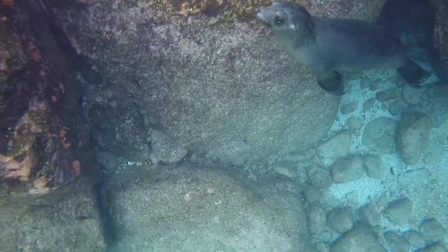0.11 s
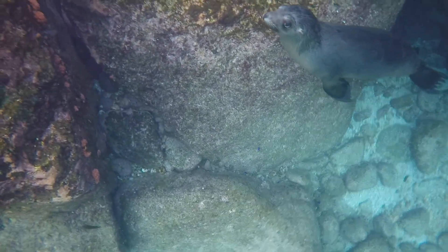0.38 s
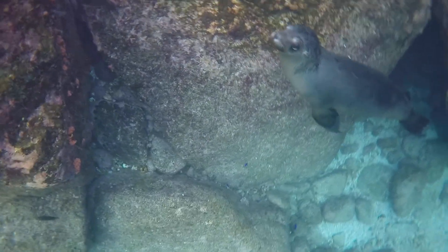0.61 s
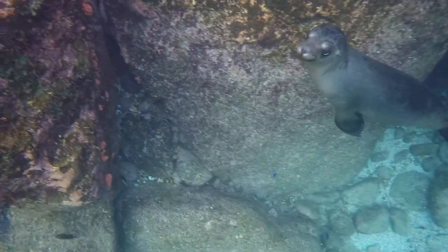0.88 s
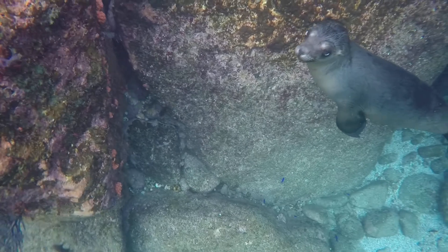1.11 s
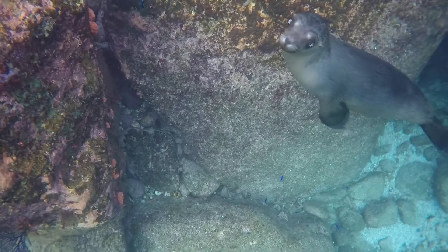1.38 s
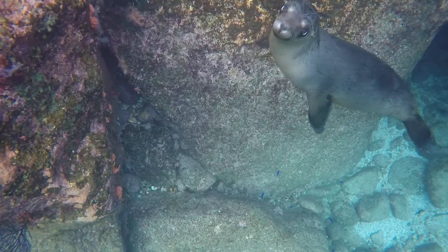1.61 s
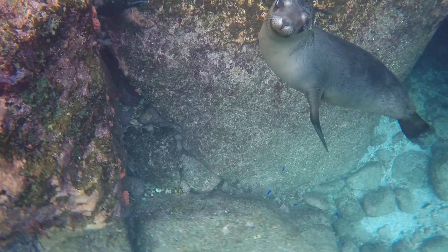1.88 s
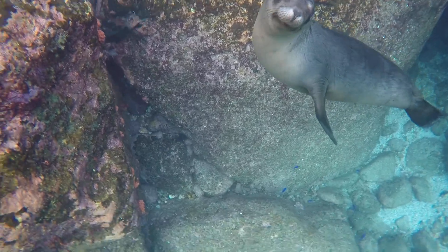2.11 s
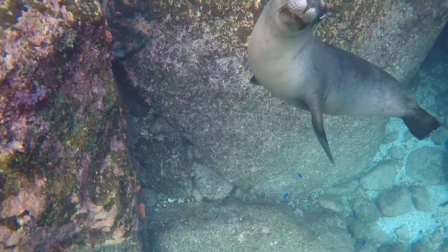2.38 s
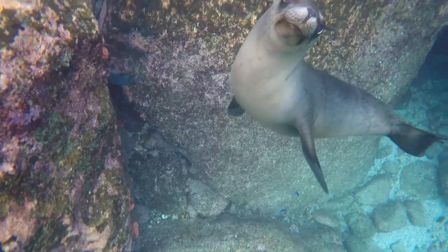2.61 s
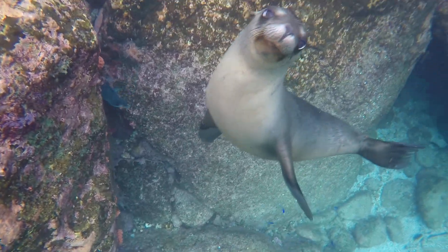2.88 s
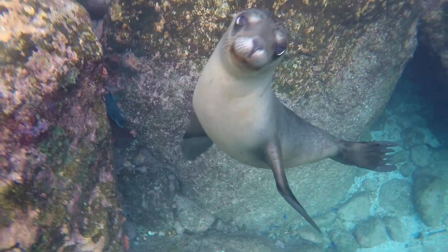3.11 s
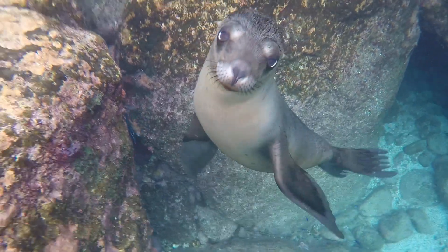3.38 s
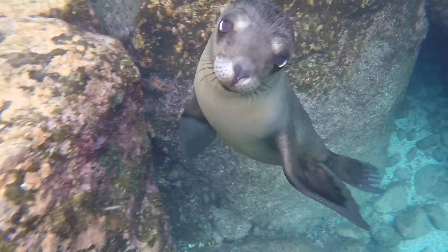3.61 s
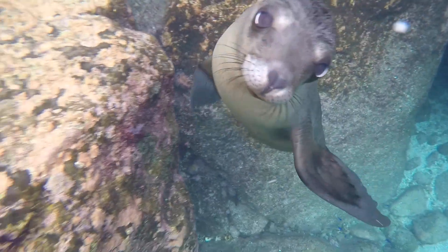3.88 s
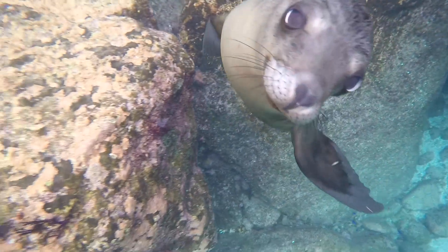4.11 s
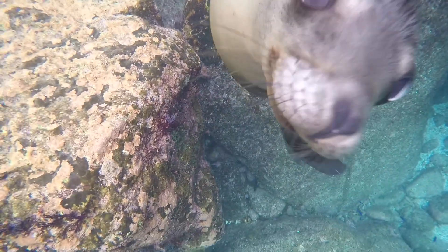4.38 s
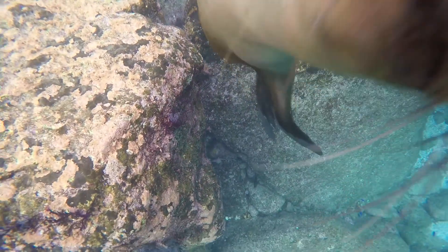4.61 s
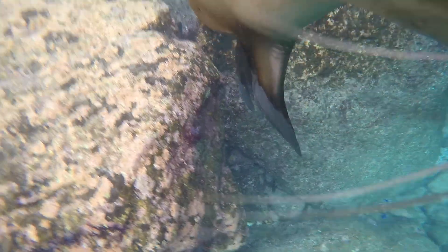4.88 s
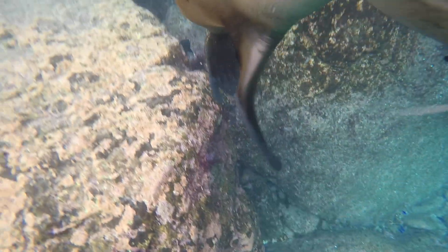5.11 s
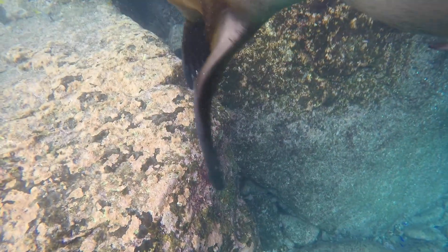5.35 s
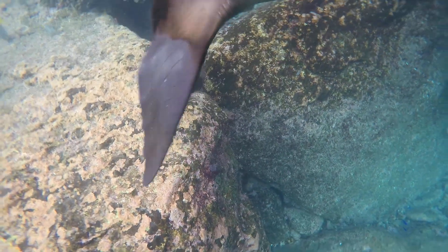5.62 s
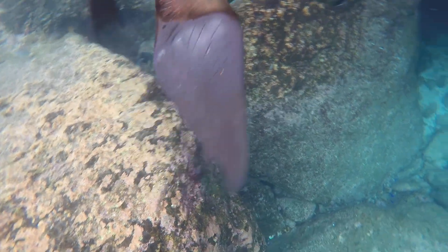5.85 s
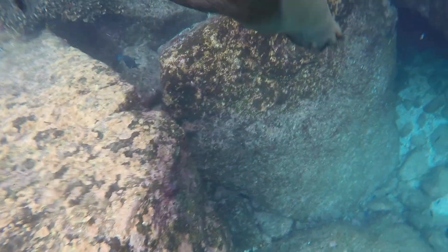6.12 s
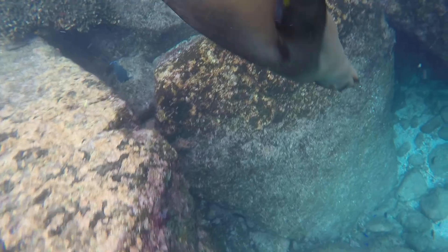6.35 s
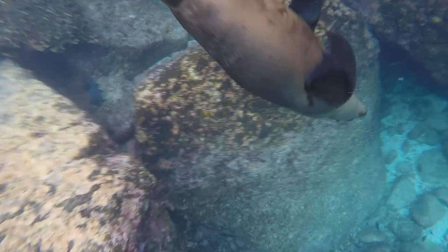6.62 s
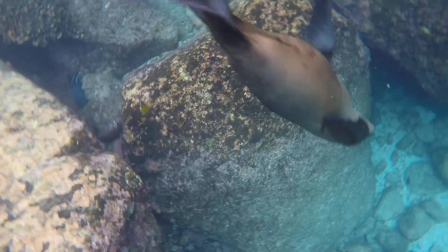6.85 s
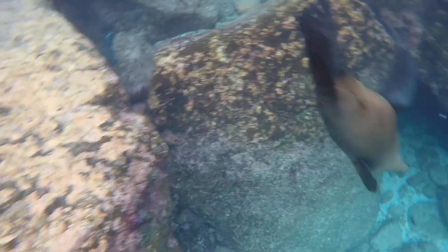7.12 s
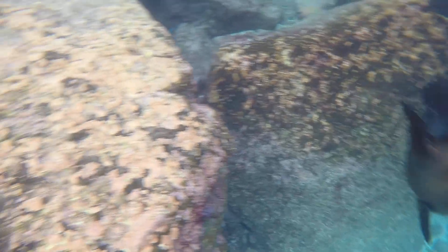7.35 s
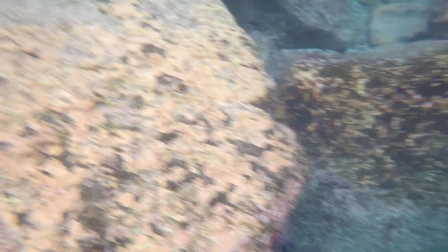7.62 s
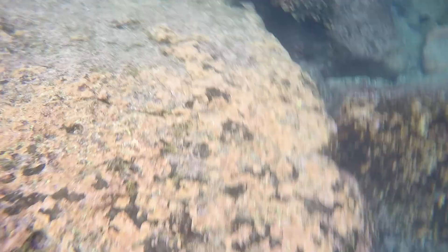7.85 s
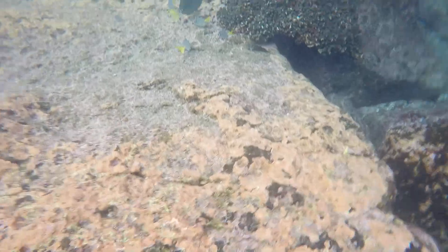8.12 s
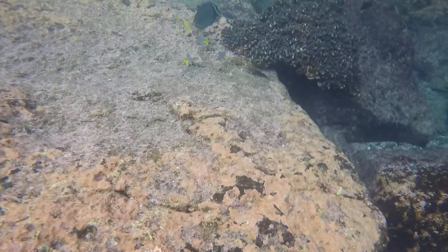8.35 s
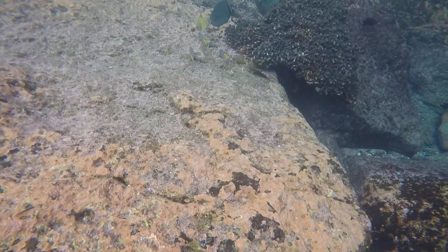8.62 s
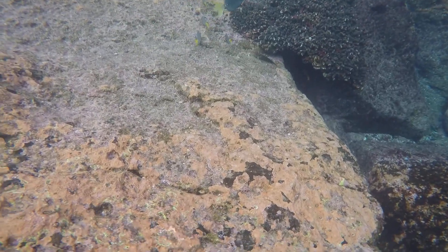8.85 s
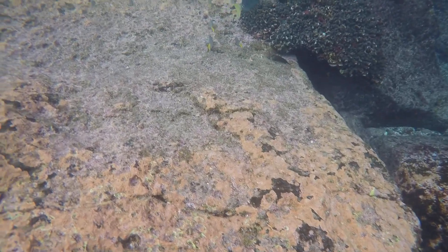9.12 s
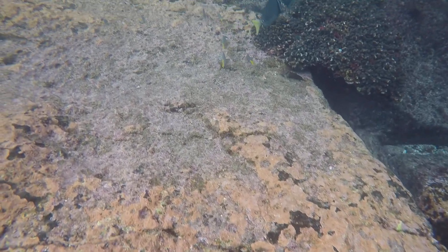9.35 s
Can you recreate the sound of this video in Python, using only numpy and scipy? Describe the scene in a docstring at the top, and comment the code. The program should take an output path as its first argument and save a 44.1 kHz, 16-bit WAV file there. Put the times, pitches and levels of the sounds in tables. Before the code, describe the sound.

Constant snapping-shrimp crackle rings inside a plastic housing above a dull surging rumble, with small bubbles, knocks and one louder cluster past seven seconds.

```python
"""Snapping shrimp click near and far over a shallow rocky reef, heard inside a camera's sealed plastic housing.
Each snap is a fading noise burst ringing the housing's resonances; tiny snaps over a swelling noise make
the far reef, under the microphone's own treble hiss. Shaped noise washes in the lowest resonance and rumbles
as surge, with bumps and taps on the case. Low knocks and rising bubbles are damped tones, a young seal's
whiskers brush past as a rasp of noise, and a faint low hum, a wavering tone in narrow noise, comes and goes."""
import sys
import numpy as np
from scipy import signal
from scipy.fft import rfft, irfft, next_fast_len
from scipy.io import wavfile
from scipy.ndimage import uniform_filter1d

SR = 44100
rng = np.random.default_rng(int(sys.argv[2]) if len(sys.argv) > 2 else 0)


def digitize_waveform(pressure):
    """Quantize a signal to 16-bit integers and store it at the path in sys.argv[1].

    Rows of a 2-D input are taken as channels; values are limited to [-1, 1].
    """
    field = np.atleast_2d(pressure).T
    bounded = np.clip(field, -1, 1)
    quanta = np.round(bounded * 32767).astype(np.int16)
    wavfile.write(sys.argv[1], SR, quanta)


def linear_from_db(decibels):
    """Turn decibels (scalar or array-like) into linear amplitude factors; 0 gives 1."""
    return 10 ** (np.asarray(decibels, float) / 20)


N = 418068
GRAIN = 2048  # samples in one snap or tap

# moving water and the far reef: time_s [s], gurgle_db [dB], wash_db [dB], crackle_db [dB]
WATER = [(0.0, -49.5, -44.5, -53), (0.42, -47, -40.5, -52.5), (0.79, -54, -40, -51.5),
         (1.63, -46.5, -42.5, -53.5), (3.06, -55.5, -38.5, -52.5), (3.27, -53, -41.5, -52.5),
         (4.62, -52, -38, -52), (4.88, -65, -39.5, -54), (5.7, -57.5, -38.5, -52.5),
         (6.36, -46.5, -41, -52.5), (6.97, -50, -40, -52), (7.12, -44.5, -41, -48.5),
         (7.22, -43.5, -37, -51.5), (7.4, -39, -40, -47.5), (7.58, -40, -39, -51.5), (7.7, -47.5, -43, -52),
         (8.05, -42.5, -40, -54.5), (8.17, -42.5, -39.5, -53), (8.42, -49, -40, -52.5),
         (8.84, -44, -38.5, -51.5), (9.48, -53, -38.5, -55.5)]


def curve(table, column):
    """One column of a table, drawn as straight lines between its times."""
    rows = np.array(table)
    return np.interp(np.arange(N) / SR, rows[:, 0], rows[:, column])


def walk(rate_hz):
    """Slow random movement of spread 1: levels held for 1 / rate_hz, then smoothed twice."""
    hold = int(SR / rate_hz)
    steps = np.repeat(rng.standard_normal(N // hold + 1), hold)
    smooth = uniform_filter1d(uniform_filter1d(steps, hold), hold)[:N]
    return smooth / smooth.std()


def noise(gain):
    """Noise of rms 1 whose spectrum follows gain(Hz)."""
    size = next_fast_len(N)
    spectrum = rfft(rng.standard_normal(size))
    f = np.fft.rfftfreq(size, 1 / SR) + 1
    shaped = irfft(spectrum * gain(f), size)[:N]
    return shaped / shaped.std()


def steadied(x, share, span_s):
    """Even out a share of a noise's chance fading, tracked over span_s; rms 1."""
    power = uniform_filter1d(x ** 2, int(span_s * SR))
    even = x / power ** (np.clip(share, 0, 1) / 2)
    return even / even.std()


def points(table):
    """Gain function through (Hz, dB) points, straight over log frequency."""
    hz, db = np.transpose(table)
    return lambda f: linear_from_db(np.interp(np.log(f), np.log(hz), db))


def peak(f, hz, width_hz):
    """Power of one resonance."""
    return 1 / (1 + ((f - hz) * 2 / width_hz) ** 2)


def lowpass(f, hz, order):
    """Smooth roll-off above hz; the larger the order, the steeper."""
    return 1 / np.sqrt(1 + (f / hz) ** order)


def highpass(f, hz, order):
    """Smooth roll-off below hz; the larger the order, the steeper."""
    return 1 / np.sqrt(1 + (hz / f) ** order)


def housing(f):
    """Gain of the case wall: resonances side by side, cancelling just under the upper group."""
    # resonances: pitch_hz [Hz], width_hz [Hz, before the exponent sharpens it], level_db [dB, relative]
    resonances = [(598, 86, 33), (1588, 147, 1), (1890, 120, 4), (1984, 360, -0.5), (2338, 340, 0),
                  (2890, 420, -5), (3220, 350, -9.5), (3830, 400, -5), (4200, 860, -11), (5220, 555, -7),
                  (6650, 1280, -14), (9710, 1650, -18), (11900, 12000, -22.5), (14600, 1400, -41)]
    modes = sum(linear_from_db(db) ** 2 * peak(f, hz, width) ** 1.637 for hz, width, db in resonances)
    notch = 1 - 0.9 * peak(f, 1482, 81)  # centre and width in Hz
    return np.sqrt(modes * notch)


def causal(gain):
    """Minimum-phase response for a gain, so that rings follow their blow."""
    cepstrum = irfft(np.log(gain + 1e-9))
    cepstrum[..., 1:GRAIN // 2] *= 2
    cepstrum[..., GRAIN // 2 + 1:] = 0
    return np.exp(rfft(cepstrum))


def place(start_s, peak_db, grains):
    """Scale each grain to its peak level and mix it in at its time."""
    grains = linear_from_db(peak_db) * grains / np.abs(grains).max(axis=1, keepdims=True)
    at = (np.asarray(start_s) * SR).astype(int) + np.arange(grains.shape[1])
    return np.bincount(at.ravel(), grains.ravel(), N + SR)[:N]


def crackle_swell():
    """Rise and fall of the distant crackle around its mean, in dB."""
    crackle_db = curve(WATER, 3)
    return crackle_db - crackle_db.mean()


def microphone_hiss():
    """The microphone's own steady hiss in the treble hardly swells; a smooth fizz lies over the very top."""
    high = noise(lambda f: housing(f) * highpass(f, 5900, 6))
    fizz = noise(lambda f: highpass(f, 11000, 6)) * linear_from_db(-76.0)
    return high * linear_from_db(-68.5 + 0.1 * crackle_swell() + 1.0 * walk(7.3)) + fizz


def water():
    """Surge pushes on the case; a deep drone, a gurgle and the wash above it flicker apart."""
    # surge spectrum: pitch_hz [Hz], level_db [dB per Hz, relative]
    surge_spectrum = [(5.9, -15), (10, 2), (24, 5.5), (36, -6.5), (60, -15.5), (86, -24.5), (100, -33),
                      (130, -55), (220, -120)]
    # wash spectrum, strongest around the lowest resonance: pitch_hz [Hz], level_db [dB per Hz, relative]
    wash_spectrum = [(76, -51), (130, -7.5), (194, -12.5), (269, -10), (392, -9), (595, 0.5), (826, -14),
                     (950, -21), (1060, -36.5), (1400, -34), (1820, -30.5), (3080, -120)]
    # surge on the case: time_s [s], level_db [dB]
    surge_level = [(0.0, -36), (0.18, -31), (0.31, -47), (0.37, -31), (1.0, -35.5), (1.08, -23.5),
                   (1.19, -30), (1.43, -31), (1.53, -38), (1.9, -29.5), (2.03, -38), (2.17, -28.5),
                   (2.24, -42), (2.64, -26.5), (2.67, -34), (3.11, -24), (3.38, -36), (3.48, -29.5),
                   (4.14, -30.5), (4.2, -41), (4.33, -28.5), (4.38, -37), (4.8, -26.5), (4.91, -37),
                   (4.96, -30.5), (5.02, -35), (5.89, -31.5), (6.12, -21), (6.26, -34.5), (6.36, -28.5),
                   (6.73, -31.5), (6.76, -28.5), (7.31, -35), (7.36, -26), (7.44, -37.5), (8.02, -15.5),
                   (8.08, -22.5), (8.37, -23), (8.4, -31), (8.82, -33), (8.98, -26), (9.16, -37),
                   (9.27, -30.5), (9.48, -39.5)]
    surge = steadied(noise(points(surge_spectrum)), share=0.87, span_s=0.084)
    surge = surge * linear_from_db(curve(surge_level, 1) + 1.6 * walk(8.1))
    wash = points(wash_spectrum)
    # three bands of the wash part at 200 and 410 Hz and move independently
    drone = noise(lambda f: wash(f) * lowpass(f, 200, 6))
    gurgle = noise(lambda f: wash(f) * lowpass(f, 410, 6) * highpass(f, 200, 6))
    upper = noise(lambda f: wash(f) * highpass(f, 410, 6))
    drone = drone * linear_from_db(-55.5 + 1.9 * walk(4.8))
    gurgle = gurgle * linear_from_db(curve(WATER, 1) + 2.0 * walk(15) + 2.6 * walk(4))
    upper = upper * linear_from_db(curve(WATER, 2) + 1.32 * walk(18) + 0.5 * walk(5))
    return surge + drone + gurgle + upper


def hum():
    """A low tone that wavers in pitch, blurred by a narrow rumble around it."""
    # comings and goings of the hum: time_s [s], level_db [dB]
    hum_level = [(0.0, -48), (0.4, -44), (2.24, -48), (2.4, -45), (2.6, -50.5), (3.03, -44), (3.15, -68),
                 (3.95, -67), (4.2, -46), (4.57, -44.5), (4.86, -48), (5.23, -43), (5.52, -61), (6.68, -64),
                 (6.73, -47), (7.05, -55), (8.71, -45.5), (8.95, -65), (9.48, -65)]
    pitch_hz, waver_hz, blur_width_hz, blur_db = 114.3, 3.56, 20, -3.0
    phase = 2 * np.pi * np.cumsum(pitch_hz + waver_hz * walk(25)) / SR
    tone = np.sqrt(2) * np.sin(phase)
    blur = noise(lambda f: peak(f, pitch_hz, blur_width_hz))
    both = tone + linear_from_db(blur_db) * blur
    return both / both.std() * linear_from_db(curve(hum_level, 1) + 1.3 * walk(6.5))


def far_reef():
    """Shrimp further off: many small snaps at random moments over a wash of those too far to tell apart."""
    count, base_db, spread_db, most_db = 2300, -50, 5, 11
    moment, size, low_cut, middle_cut, treble_cut, pitch, length = rng.random((count, 7)).T
    # most snaps are small, a few stand out
    size_db = base_db + np.minimum(-spread_db * np.log(size), most_db)
    ring_db = [size_db - 12 * low_cut, size_db - 12 * middle_cut, size_db - 7 - 22 * treble_cut ** 0.98]
    favoured_hz = 1600 * 4.2 ** pitch
    t60_s = 0.0059 + 0.02 * length ** 1.5
    rows = np.transpose([moment * N / SR, *ring_db, favoured_hz, t60_s])

    blend = noise(lambda f: housing(f) * highpass(f, 1400, 9) * lowpass(f, 5900, 6))
    blend = blend * linear_from_db(curve(WATER, 3) - 2.5 + 1.5 * walk(25) + 1.0 * walk(150))
    return blend + linear_from_db(0.79 * crackle_swell()) * snaps(rows, shock=1.6, favour_db=4)


def bumps():
    """The case is jolted: a deep heave under a rough shudder with a sharp upper edge."""
    # bumps on the case: start_s [s], length_s [s], level_db [dB], top_hz [Hz]
    jolts = [(1.033, 0.06, -27, 186), (2.691, 0.033, -38, 199), (2.933, 0.029, -35, 251),
             (2.951, 0.038, -32, 120), (2.997, 0.035, -26.5, 308), (3.047, 0.063, -22, 290),
             (3.062, 0.034, -27, 89), (3.097, 0.03, -32, 260), (6.334, 0.035, -34.5, 170),
             (6.726, 0.064, -29.5, 124), (8.001, 0.05, -29, 110)]
    heave_hz, heave_db = 70, 3.2  # top of the heave, and its level over the shudder

    def rumble(top_hz):
        """Low-passed noise of rms 1, half a second long."""
        edge = signal.butter(6, top_hz, fs=SR, output="sos")
        low = signal.sosfilt(edge, rng.standard_normal(SR // 2))
        return low / low.std()

    t, out = np.arange(N) / SR, np.zeros(N)
    for start_s, length_s, db, top_hz in jolts:
        near = slice(int(start_s * SR), int((start_s + length_s) * SR))
        both = rumble(top_hz) + linear_from_db(heave_db) * rumble(heave_hz)
        both = steadied(both, share=0.39, span_s=0.011)
        progress = np.abs((t[near] - start_s) / length_s)
        swell = np.abs(np.sin(np.pi * progress ** 0.66)) ** 0.73  # rises faster than it falls
        out[near] += linear_from_db(db) * swell * both[-len(progress):]
    return out


def taps():
    """Dull broad thuds: decaying noise that fills the gap between the housing's resonances."""
    # taps on the case wall: start_s [s], peak_db [dB]
    thuds = [(0.357, -36.5), (1.049, -32), (2.2322, -36), (2.7395, -38), (3.0443, -32), (3.0665, -38),
             (3.081, -35), (3.106, -38), (4.842, -30), (6.4563, -36), (7.194, -33), (7.2353, -22.5),
             (7.9513, -40), (7.9775, -22), (7.9914, -33), (8.0234, -27), (8.5799, -41), (8.5964, -30)]
    low_hz, high_hz, t60_s = 650, 1300, 0.013
    start_s, peak_db = np.transpose(thuds)[:, :, None]
    t = np.arange(GRAIN) / SR
    burst = rng.standard_normal((len(thuds), GRAIN)) * linear_from_db(-60 * t / t60_s)
    band = signal.butter(3, [low_hz, high_hz], "band", fs=SR, output="sos")
    return place(start_s, peak_db, signal.sosfilt(band, burst))


def brush():
    """Whiskers on the case: a short rasp of stiff bristles, bright on top of a scratchy body."""
    # strength of the rasp: time_s [s], level_db [dB]
    rasp_level = [(4.845, -78), (4.853, -48), (4.87, -52), (4.895, -42.5), (4.903, -42), (4.908, -78)]
    rasp = noise(lambda f: housing(f) * (f / 5000) ** 1.4) * linear_from_db(2.6 * walk(300))
    body = noise(lambda f: housing(f) * lowpass(f, 1550, 14) * f / (1 + (f / 3300) ** 6))
    body = body * linear_from_db(-44.5 + 4.0 * walk(500))
    time_s, db = np.transpose(rasp_level)
    gain = linear_from_db(np.interp(np.arange(N) / SR, time_s, db, left=-200, right=-200))
    return rasp * gain + body * (gain > linear_from_db(-65))  # the body is simply on while the rasp is up


def rings(rows, rise_s, rough, glide=0):
    """Soft blows: a damped tone whose pitch wobbles by rough and climbs by the share glide over its t60."""
    start_s, peak_db, hz, t60_s = np.transpose(rows)[:, :, None]
    t = np.arange(3 * GRAIN) / SR
    wobble = uniform_filter1d(rng.standard_normal((len(rows), len(t))), 200, axis=1) * np.sqrt(200)
    pitch_hz = hz * (1 + rough * wobble + glide * t / t60_s)
    tone = np.sin(2 * np.pi * np.cumsum(pitch_hz, axis=1) / SR)
    tone = tone * (1 - np.exp(-t / rise_s)) * linear_from_db(-60 * t / t60_s)
    tone = tone * np.cos(np.pi / 2 * t / t[-1])  # silent by the end of the grain
    return place(start_s, peak_db, tone)


def bubbles():
    """Pockets of air in the moving water: short rough tones that climb."""
    # bubbles: start_s [s], peak_db [dB], start_pitch_hz [Hz], t60_s [s]
    air_pockets = [(0.239, -42, 336, 0.12), (0.449, -39, 770, 0.053), (3.469, -30, 424, 0.065),
                   (4.533, -44, 780, 0.028), (4.725, -37.5, 762, 0.095), (5.102, -35, 350, 0.083),
                   (5.704, -39.5, 820, 0.062), (6.111, -37, 362, 0.11), (6.954, -33, 406, 0.11),
                   (7.183, -33, 348, 0.14), (7.276, -38, 394, .07), (7.335, -38, 270, 0.1),
                   (7.43, -36, 235, 0.087), (7.489, -34, 370, 0.11), (7.572, -35.5, 321, .1),
                   (8.115, -38, 243, .2), (8.17, -40, 315, 0.14), (8.51, -30.5, 284, 0.095),
                   (8.594, -36.5, 348, 0.078), (8.731, -39, 328, 0.14), (8.894, -48, 785, .06)]
    return rings(air_pockets, rise_s=0.0049, rough=0.12, glide=0.46)


def knocks():
    """Low knocks, like bubbles or pebbles: quick rough tones that hold their pitch on average."""
    # knocks: start_s [s], peak_db [dB], pitch_hz [Hz], t60_s [s]
    low_blows = [(1.191, -27, 580, 0.074), (1.349, -26, 513, 0.052), (1.44, -31, 558, 0.07),
                 (1.942, -19, 510, 0.026), (2.233, -23.5, 655, 0.031), (2.301, -25.5, 478, 0.11),
                 (2.664, -34, 623, 0.11), (3.2, -27, 567, 0.07), (3.85, -25.5, 570, 0.056),
                 (4.807, -24.5, 580, 0.044), (5.039, -37, 570, 0.057), (5.1, -28, 560, 0.061),
                 (5.679, -28, 613, 0.056), (6.542, -24.5, 544, 0.046), (7.115, -27.5, 444, 0.038),
                 (7.181, -28, 494, 0.24), (7.235, -17.5, 677, 0.021), (8.023, -24.5, 653, 0.034),
                 (8.464, -27.5, 598, 0.18), (8.595, -27, 582, 0.095), (8.823, -27, 607, 0.055),
                 (8.933, -27, 630, 0.078)]
    return rings(low_blows, rise_s=0.0013, rough=0.093)


def snaps(rows, shock=4.5, favour_db=8):
    """A claw's bubble collapses; rock reflections smear it into a short burst that rings the housing."""
    echo_db, echo_t60_s, treble_t60_s = -21.5, 0.72, 0.22
    hold, tick = 1.296, 0.89  # bend of the fade; strength of the first instant
    sparse_db, patchy_db = 3.5, 3  # spread of level over time and over frequency
    start_s, *ring_db, favoured_hz, t60_s = np.transpose(rows)[:, :, None]
    t, f = np.arange(GRAIN) / SR, np.fft.rfftfreq(GRAIN, 1 / SR) + 1

    # close reflections hold the level for a moment before it drops, over a longer faint echo
    fade = linear_from_db(-60 * (t / t60_s) ** hold) + linear_from_db(echo_db - 60 * t / echo_t60_s)
    # the direct shock arrives first and sharpest
    first = 1 + tick * np.minimum(0.025 / t60_s, 1.3) * np.exp(-t / 0.00025)
    fade = fade * first * np.cos(np.pi / 2 * t / t[-1])
    burst = rng.standard_normal((len(rows), GRAIN))
    burst[:, 0] = shock
    # single reflections stand out of the burst
    glints = linear_from_db(sparse_db * np.repeat(rng.standard_normal((len(rows), GRAIN // 32)), 32, axis=1))

    # the path among the rocks favours one region of the spectrum
    colour = 1 + linear_from_db(favour_db) / (1 + 2j * (f - favoured_hz) / (0.3 * favoured_hz))
    # and lets through more or less of the very top
    tilt = rng.standard_normal((len(rows), 1)) - 1.1
    colour = colour * np.maximum(f / 8500, 1) ** tilt
    # reflections cancel here and add up there, differently for each snap
    knots_hz = np.linspace(1000, 16000, 16)
    chances = rng.standard_normal((len(rows), len(knots_hz)))
    patches = linear_from_db(patchy_db * np.array([np.interp(f, knots_hz, row) for row in chances]))
    spectrum = rfft(burst * fade * glints) * colour * causal(patches)

    # power above each edge in Hz parts the low, middle and treble rings
    above_low, above_middle, above_treble = (1 / (1 + (edge / f) ** 18) for edge in (1400, 2600, 5900))
    bands = (above_low * (1 - above_middle), above_middle * (1 - above_treble), above_treble)
    dampings = (1, 1, linear_from_db(-60 * t / treble_t60_s))
    out = np.zeros(N)
    for db, band, damping in zip(ring_db, bands, dampings):
        ring = irfft(spectrum * causal(housing(f) * np.sqrt(band))) * damping
        out += place(start_s, db, ring)
    return out


def near_snaps():
    """Shrimp close by: snaps with a hard first shock and a strongly favoured pitch region."""
    # near snaps: start_s [s], low_peak_db [dB], middle_peak_db [dB], treble_peak_db [dB],
    # favoured_hz [Hz], t60_s [s]
    near_shrimp = [(.0384,-32,-33.5,-45,3850,0.086),(.078,-56,-52,-44,13500,.02),(.1254,-50,-41,-41,4040,.025),(.1375,-36,-30,-31.5,5300,0.034),(.164,-47,-30,-42,3630,0.019),
                   (.2024,-39,-42,-55,2450,0.036),(.2584,-30,-25.5,-43,2360,0.033),(.3016,-28,-25.5,-42,3800,.019),(.3222,-41,-29,-41,4020,.025),(.3978,-27,-19,-36,3100,0.025),(.4014,-33,-30,-44,3000,0.02),
                   (.4163,-36,-53,-56,2180,.025),(.43,-50,-42,-50,4500,.015),(.4872,-37,-21.5,-34,3880,0.019),(.5235,-31,-27,-33.5,4100,0.046),(.5511,-29,-19.5,-36,3440,0.02),(.595,-51,-41,-44,3800,.025),(.6918,-53,-40,-45,4000,.04),(.7452,-41,-22,-40,4200,0.018),
                   (.8005,-26.5,-25.5,-36,3740,0.015),(.8218,-29,-27,-50,3840,0.019),(.8669,-49,-44,-55,2080,.025),(.8769,-45,-37,-50,3800,.02),(.9018,-42,-34,-52,1890,0.027),(.9167,-36,-37,-43,2270,0.035),(.9461,-57,-47,-40,5270,.021),(1.0792,-36,-28,-36,3900,0.023),
                   (1.216,-35,-21.5,-30.5,3130,0.0061),(1.2195,-33,-37,-48,1900,0.009),(1.2674,-56,-33,-42,3920,0.016),(1.3253,-48,-41,-43,5480,0.034),(1.3448,-54,-35,-45,5180,0.028),(1.4197,-47,-41,-46,3800,.025),(1.4403,-58,-26,-33,5190,.016),
                   (1.5224,-55,-45,-41,10500,.02),(1.5708,-46,-37,-49,3830,.05),(1.658,-48,-47,-48,6000,.02),(1.682,-46,-45,-45,6000,.02),(1.7185,-42,-39,-55,1870,.025),(1.7293,-45,-33,-48,4060,0.027),(1.7669,-51,-40,-55,4000,.015),(1.7968,-46,-38,-52,2000,0.027),(1.8132,-59,-29,-36,4860,0.019),
                   (1.919,-39,-33,-53,3800,0.034),(1.9528,-57,-35,-39,5580,0.033),(1.9854,-51,-40,-40,4000,0.028),(2.0779,-36,-23.5,-39,6100,0.039),(2.088,-33,-40,-42,3880,0.041),(2.189,-48,-45,-40,6720,.025),
                   (2.2334,-18.5,-18.5,-32.5,3000,0.014),(2.2828,-31.5,-32,-42,2230,0.093),(2.3176,-31.5,-36,-44,2150,0.11),(2.4209,-40,-42,-48,2150,0.027),(2.4388,-38,-33,-31,5350,0.02),
                   (2.5032,-33,-23.5,-42,4320,0.019),(2.522,-58,-34,-37,4270,.025),(2.6071,-37,-31.5,-44,2540,0.022),(2.7435,-29,-39,-49,1730,0.067),
                   (2.847,-57,-52,-46,12000,.015),(2.866,-55,-48,-45,7000,.015),(2.8784,-41,-38,-52,3830,.02),(2.8931,-37,-33,-39,5140,0.057),(2.92,-28,-27.5,-39,2390,0.033),(2.9362,-34,-36,-50,4410,0.092),(2.9616,-40,-35,-46,2940,0.036),(3.092,-55,-41,-45,13000,.015),(3.136,-41,-33,-39,5400,0.026),
                   (3.2052,-35,-28,-49,3700,0.012),(3.2931,-52,-27,-35,5220,0.025),(3.3756,-32,-33,-51,2100,0.039),(3.3867,-35,-30.5,-50,2070,0.058),
                   (3.4336,-48,-37,-48,5080,.025),(3.454,-47,-30,-26.5,5170,.025),(3.4747,-48,-28,-34,6270,0.026),(3.4943,-35,-26,-42,1890,0.03),(3.5841,-25.5,-24.5,-34,1920,0.09),
                   (3.8008,-50,-41,-43,3800,0.027),(3.9001,-43,-30,-41,2940,0.031),(3.917,-32.5,-27,-30.5,6500,0.038),(3.9829,-37,-23,-35,4200,0.018),(4.0013,-43,-45,-41,5400,.025),(4.0691,-40,-20.5,-29,4070,0.019),
                   (4.1011,-41,-48,-54,1840,.025),(4.1184,-34,-33,-51,2160,0.028),(4.152,-35,-42,-54,1820,0.019),(4.1947,-55,-34,-40,3820,0.036),(4.2097,-39,-34,-43,5060,0.028),(4.2797,-38,-36.5,-58,3000,.025),(4.3359,-35,-24,-33,4570,0.027),(4.3696,-26,-23,-45,3440,0.031),
                   (4.3896,-33,-44,-42,3960,0.035),(4.4816,-44,-26.5,-34.5,5470,0.025),(4.5937,-50,-32,-32,6190,0.018),(4.6599,-56,-45,-39,6400,.025),(4.685,-32,-25,-34,4430,.016),
                   (4.7126,-38,-30,-45,3700,.015),(4.7158,-33,-42,-52,1900,0.02),(4.761,-32,-22.5,-36,3600,0.012),(4.7682,-38,-36,-39,2400,0.014),(4.775,-43,-36,-52,2400,.05),(4.8199,-38,-36,-41,2700,.027),(4.8417,-27,-27.5,-35,2780,0.01),
                   (4.8513,-40,-44,-35,2340,0.023),(4.9181,-38,-43,-35,2470,.023),(5.1143,-39,-45,-52,3800,0.044),(5.142,-44,-42,-43,6000,0.023),(5.251,-52,-35,-25,10100,0.014),
                   (5.2822,-34,-22,-26,3750,0.012),(5.2866,-17,-19,-31,2290,0.031),(5.3397,-40,-21.5,-40,3730,0.047),(5.3746,-33,-31.5,-44,2970,0.03),
                   (5.453,-39,-35,-55,3800,0.074),(5.4821,-24,-17.5,-32,2740,0.025),(5.5266,-36,-30.5,-46,4030,0.034),(5.5984,-48,-35,-42,3650,0.028),(5.6347,-45,-28,-33,5350,0.018),(5.6412,-33,-33,-52,2000,0.012),
                   (5.6875,-45,-32,-38,5100,.023),(5.7309,-50,-37,-51,3200,.02),(5.7697,-46,-33,-42,4810,.025),(5.78,-43,-37,-39,3790,0.047),(5.802,-50,-27,-39,5130,0.028),(5.8596,-37,-40,-52,2700,.02),(5.8737,-56,-44,-43,5350,0.024),(5.883,-40,-38,-51,2800,.03),(5.9354,-42,-37.5,-49,3500,0.034),(6.107,-25,-20.5,-26,2280,0.033),
                   (6.1187,-46,-31,-46,2330,0.043),(6.151,-48,-31.5,-53,4870,0.036),(6.1762,-35,-31.5,-40,4040,0.04),(6.2321,-32.5,-27,-38,5310,0.024),
                   (6.2911,-28.5,-36,-42,2120,0.03),(6.4253,-39,-44,-52,1870,.025),(6.4563,-35,-44,-59,1870,0.025),(6.4806,-37,-33,-52,2880,0.027),(6.492,-41,-35,-43,2400,.029),(6.5714,-25.5,-24,-37,3460,.025),(6.6144,-37,-38,-55,2160,0.031),(6.6503,-38,-38,-55,1930,0.03),(6.6757,-44,-36,-50,3800,.02),(6.7467,-32,-28.5,-37.5,4130,0.026),
                   (6.776,-47,-25,-48,2970,0.017),(6.8596,-48,-47,-36,5000,0.019),(6.886,-26,-29.5,-42,2620,0.023),(7.0519,-49,-36,-43,1880,.025),(7.0779,-48,-35.5,-39,4360,.029),(7.1182,-40,-40,-50,1900,.025),(7.1433,-36,-31.5,-44,2890,0.036),
                   (7.1931,-30,-38,-63,1830,0.016),(7.2227,-29,-32,-49,3010,0.044),(7.2363,-17,-13,-21.5,4900,0.014),(7.2385,-14,-22.5,-34,1630,0.02),(7.295,-46,-43,-56,3000,.04),(7.318,-46,-41,-54,2900,0.027),(7.3514,-44,-34,-54,2790,.025),(7.392,-46,-36.5,-47,3900,.04),(7.4215,-45,-31,-44,2350,.017),(7.4414,-48,-37,-35.5,3080,.025),
                   (7.461,-36,-38,-52,3900,0.033),(7.4757,-33,-49,-55,1780,0.027),(7.5776,-39,-36,-45,3950,.039),(7.6289,-45,-28,-27.5,2380,0.02),(7.6521,-42,-35,-45,3870,.025),(7.6942,-37,-30.5,-42,4100,0.039),(7.787,-33.5,-40,-56,2390,0.027),
                   (7.8969,-30,-23,-48,3100,0.027),(7.9135,-48,-51,-40,3940,0.023),(7.9516,-32,-38,-54,1940,.012),(7.9595,-36,-36,-52,1940,.015),(7.9675,-34,-34,-52,1960,.018),(7.9779,-23,-33,-50,1890,0.0099),(7.9872,-29,-37,-52,2400,.009),(7.9919,-29,-36,-50,1770,.01),(7.9985,-33,-36,-52,1900,.012),(8.006,-46,-47,-56,1900,.012),
                   (8.0166,-32,-37,-46,1850,0.023),(8.0234,-22.5,-21.5,-34,1770,0.013),(8.031,-47,-40,-52,2000,.012),(8.045,-43,-45,-54,1900,.015),(8.1805,-50,-40,-38,5200,.025),(8.3016,-36,-33,-50,1890,0.067),(8.3872,-38,-25.5,-41,4900,.023),
                   (8.5778,-29,-22,-32,4000,0.035),(8.597,-11,-11.5,-29.5,2440,0.013),(8.603,-21,-26,-37,2420,0.049),(8.7851,-50,-28.5,-54,2940,0.023),(8.8249,-40,-30,-40,2760,0.028),
                   (8.8387,-29,-25,-25,6340,.017),(8.8471,-29,-16,-38,3120,0.022),(8.8777,-34,-37,-54,3830,0.031),(8.9777,-54,-44,-42,5500,.025),(9.0381,-37,-29,-47,2350,0.021),(9.0822,-50,-32,-45,5200,.025),
                   (9.1277,-36,-33,-40.5,2390,0.015),(9.2543,-37,-54,-61,2360,.027),(9.3693,-29,-29.5,-38,3580,0.032),(9.433,-44,-35.5,-51,3790,0.027)]
    return snaps(near_shrimp)


def scene():
    """All sounds at the single microphone, with its own hiss."""
    background = microphone_hiss() + water() + hum() + far_reef()
    contact = bumps() + taps() + brush() + bubbles() + knocks()
    return (background + contact + near_snaps())[None]


def roll_off(x):
    """The treble ends steeply here."""
    return signal.sosfilt(signal.butter(12, 16490, fs=SR, output="sos"), x)


def record(dry):
    """The camera cuts the top steeply above 15450 Hz."""
    top_cut = signal.butter(18, 15450, fs=SR, output="sos")
    mix = signal.sosfilt(top_cut, dry)
    return roll_off(mix)


dry = scene()
out = record(dry)
digitize_waveform(out)
```